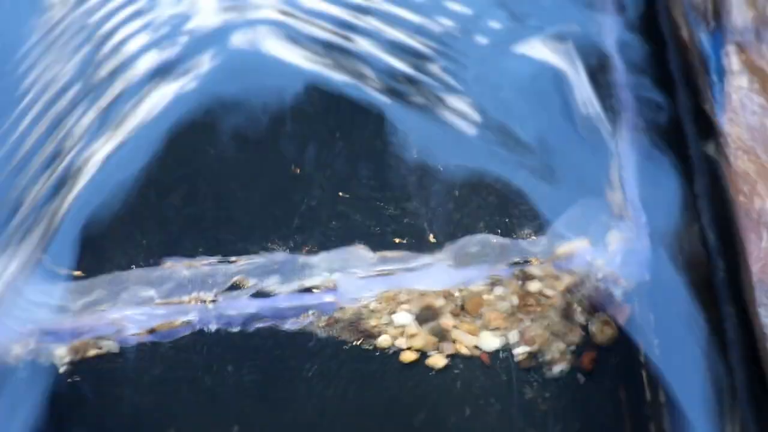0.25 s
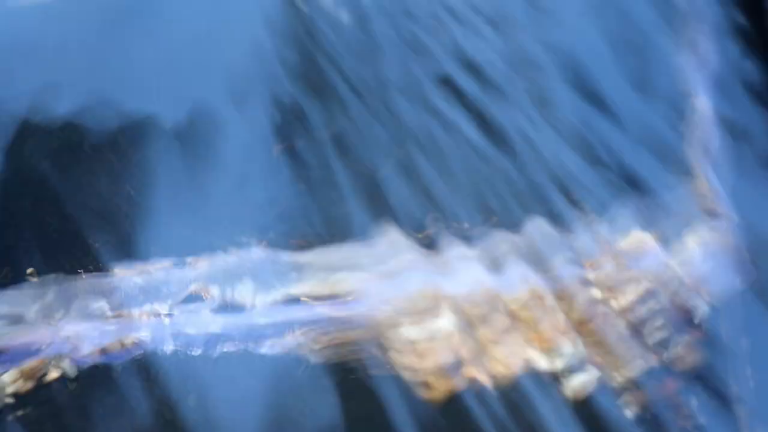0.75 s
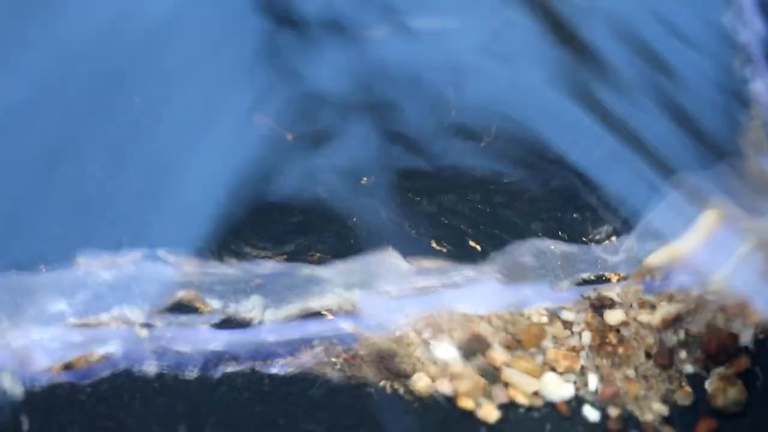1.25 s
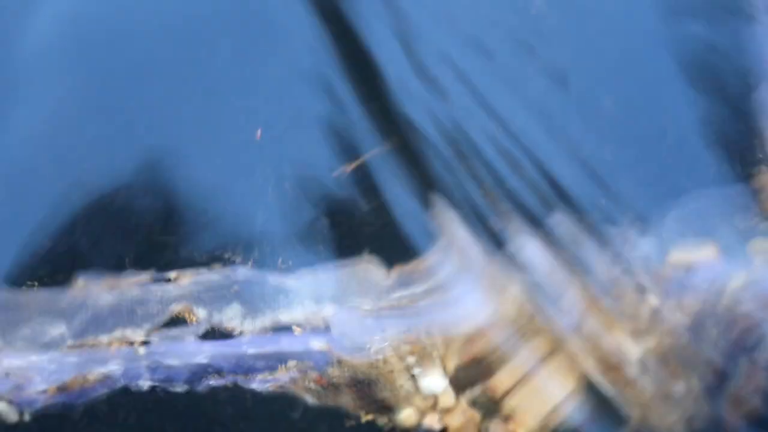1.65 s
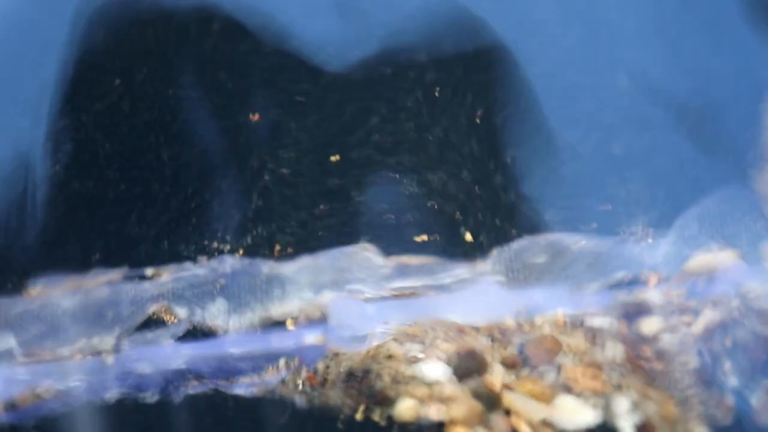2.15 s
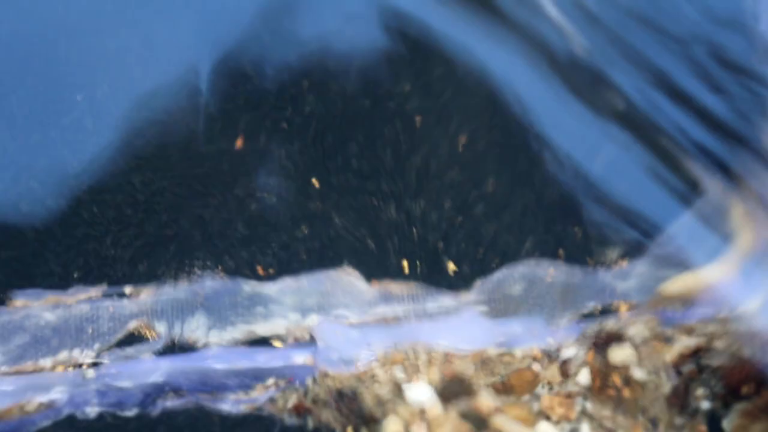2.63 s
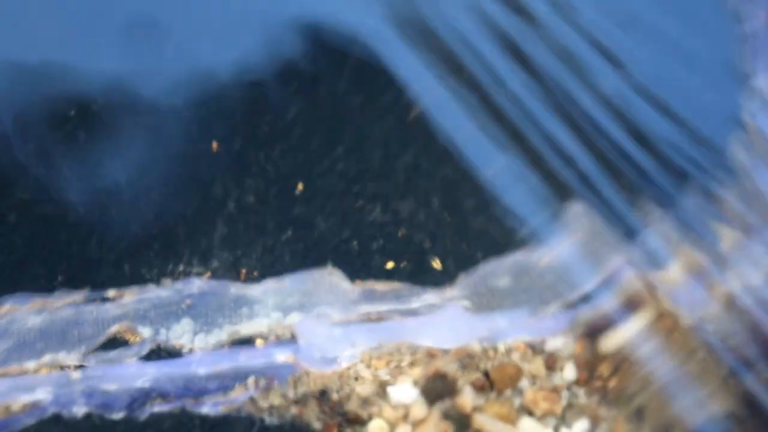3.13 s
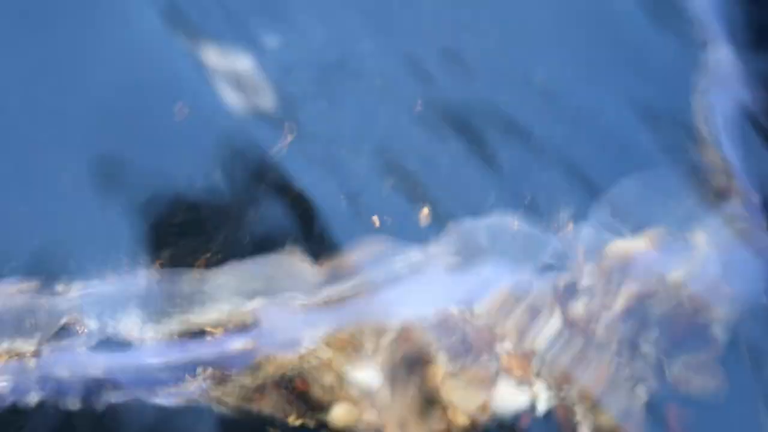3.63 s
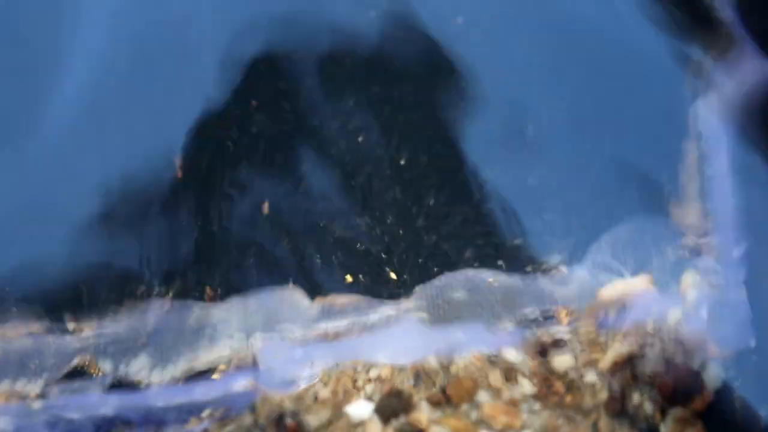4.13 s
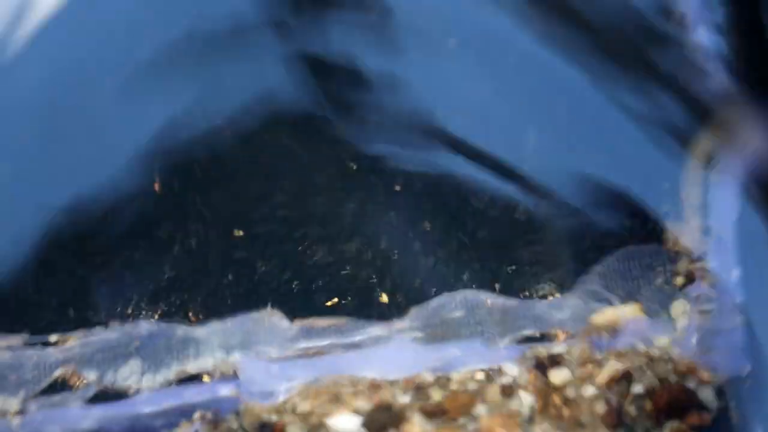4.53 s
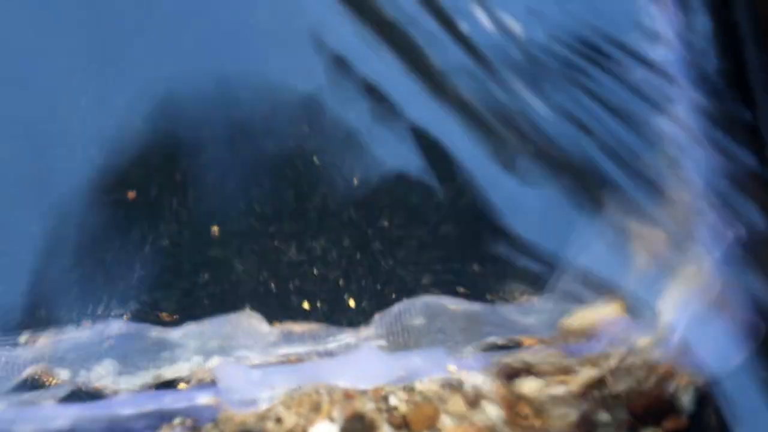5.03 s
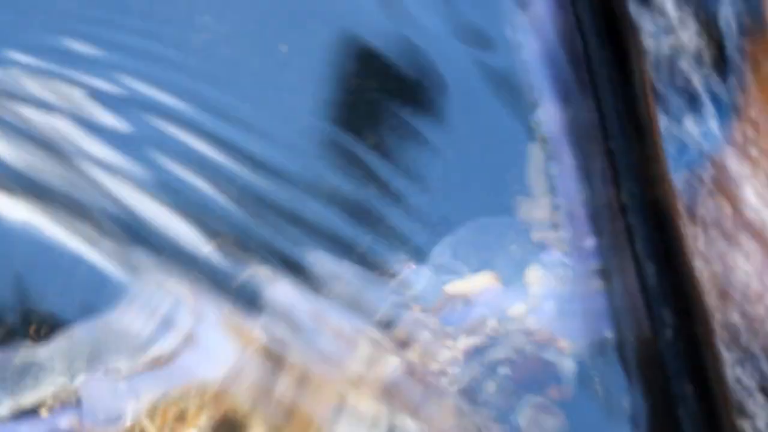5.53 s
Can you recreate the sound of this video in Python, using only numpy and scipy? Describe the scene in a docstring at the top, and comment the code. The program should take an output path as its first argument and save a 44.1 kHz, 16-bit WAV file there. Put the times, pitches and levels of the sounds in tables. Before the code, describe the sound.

Close, steady gurgling and bubbling of river water pouring over the ridges of a sluice box, with light splashes.

```python
"""A sluice box in a river, the microphone close to the running water. From the start, air pockets folded
in behind the riffles gurgle, small bubbles pinch off and plink, and spray ticks on the surface, over the
wash of farther water, a faint drone of the box and a low rumble. The sheet of water slaps down on a
riffle now and then, hardest at 0.5, 3.5 and 5.1 s. Towards the end the deep gulps and the rumble grow."""
import sys
import numpy as np
from scipy import signal
from scipy.fft import rfft, irfft, next_fast_len
from scipy.io import wavfile
from scipy.ndimage import map_coordinates

SR = 44100
rng = np.random.default_rng(int(sys.argv[2]) if len(sys.argv) > 2 else 0)


def unload_wav(signal):
    """Save mono or channel-first audio to the path in sys.argv[1] as 16-bit WAV at rate SR, clipped to [-1, 1]."""
    wavfile.write(
        sys.argv[1],
        SR,
        np.round(np.clip(np.atleast_2d(signal).T, -1, 1) * 32767).astype(np.int16),
    )


N = 254765

# the loudest air pockets, close behind the riffle:
# (time of peak [s], pitch [Hz], level [dB], glide [octaves per swell time])
LOUD_GURGLES = [(0.128, 610, -30.5, -0.11), (0.173, 680, -29, 0.078), (0.273, 840, -27, -0.097),
                (0.561, 1090, -25.5, -0.21), (0.630, 1140, -25, .15), (0.683, 870, -27, -0.16),
                (0.950, 416, -34.5, 0.0096), (0.987, 732, -24, .32), (1.090, 561, -26.5, -0.074),
                (1.192, 556, -31, 0.13), (1.249, 556, -29, 0.026), (1.549, 630, -31, 0.28),
                (1.600, 1324, -27, 0.088), (2.098, 933, -26, 0.047), (2.110, 755, -29.5, 0.23),
                (2.172, 943, -25, 0.43), (2.209, 1255, -24.5, .45), (2.323, 545, -27.5, 0.24),
                (2.351, 947, -22.5, -0.18), (2.423, 1130, -29, -0.0044), (2.438, 524, -30.5, -0.086),
                (2.526, 1200, -27.5, .05), (3.003, 1024, -31.5, -.03), (3.092, 706, -26.5, -0.14),
                (3.236, 475, -36, -0.026), (3.763, 1155, -23, -0.17), (3.897, 807, -25, .28),
                (4.232, 860, -28, .22), (4.336, 442, -32.5, 0.15), (4.420, 1076, -24.5, 0.12),
                (4.464, 1294, -27.5, 0.064), (4.651, 1350, -29.5, -0.12), (4.700, 597, -29.5, 0.27),
                (4.715, 399, -32.5, .02), (5.016, 857, -23, 0.13), (5.223, 1265, -28, 0.13),
                (5.317, 1430, -24.5, -0.084), (5.517, 1240, -26, -0.0045)]
# the loudest close bubbles, low plops to high ticks: (time [s], pitch [Hz], level [dB], ring time [ms])
LOUD_PLINKS = [(0.0437, 2900, -10, 0.63), (0.552, 9590, -18, .2), (0.5854, 1970, -21.5, 8),
               (0.6578, 2700, -12.5, 0.84), (0.7694, 3450, -20, 2.7), (1.0024, 4500, -11, 1.2),
               (1.0695, 2490, -19.5, 2.6), (1.1551, 3980, -17, 1.9), (1.2951, 3830, -16, 1),
               (1.531, 1245, -21.5, 6), (1.533, 629, -24, 13), (1.8139, 3720, -19, 1.7),
               (2.0795, 3420, -13.5, 0.68), (2.6743, 3320, -16.5, 1.3), (2.838, 700, -22, 11.5),
               (2.8825, 3500, -20.5, 1.4), (3.0262, 1780, -20, 3.8), (3.0633, 3280, -15, 1.1),
               (3.1616, 4800, -19, 1.4), (3.1833, 2150, -18, 2.9), (3.287, 905, -23.5, 7.7),
               (3.489, 2610, -20.5, 4), (3.649, 5100, -17, 1.1), (3.7072, 3340, -15, 1.2),
               (4.063, 746, -24, 8.2), (4.1563, 10900, -18.5, .2), (4.4267, 1460, -21.5, 17),
               (4.5797, 2800, -15, 3.4), (4.6177, 4600, -9, 0.37), (4.7371, 3380, -14, 1.7),
               (4.9288, 4770, -12, 0.29), (4.9946, 1980, -16.5, 1.4), (5.0941, 2580, -18, 1.6),
               (5.1654, 1680, -19, 3.3), (5.3965, 8550, -16, 0.23), (5.494, 4540, -15, .85),
               (5.6638, 3520, -17.5, 3.7)]
# the sheet of water slaps down on the riffle: (time [s], lift of the splashing [dB])
RIFFLE_SLAPS = [(0.504, 10.5), (0.71, 0), (1.185, 3.5), (2.09, 5.5), (3.506, 13.5), (4.01, 3), (4.49, 1),
                (4.585, 7), (5.108, 12), (5.39, 2.5), (5.489, 8), (5.67, -3)]

# how each layer rises and falls: (time [s], level [dB])
CHURN_LEVELS = [(0, -33), (.48, -39.5), (.65, -36), (1.2, -35), (1.42, -40.5), (1.62, -33.5), (1.9, -38),
                (2.1, -36), (2.65, -37.5), (2.9, -35), (3.6, -37), (4.2, -35.5), (4.87, -38.5),
                (5.05, -36.5), (5.78, -37)]  # water tumbling behind the riffles
SPLASH_LEVELS = [(0, -35.5), (.4, -38.5), (.9, -36.3), (1.8, -39), (2.2, -37), (2.55, -38), (2.8, -36),
                 (3.2, -38.5), (4.05, -37), (4.27, -33.5), (4.55, -38.5), (5.78, -38)]  # the sheet of water falling back on itself
GULP_LEVELS = [(0, -62), (1, -56), (1.36, -76), (1.7, -48), (2.1, -56.5), (2.6, -63), (4.1, -50),
               (5.1, -57.5), (5.44, -44), (5.78, -59)]  # the largest pockets collapsing
THROB_LEVELS = [(0, -51), (.6, -45), (1.6, -56), (2.45, -57), (2.8, -48), (3.3, -56), (3.6, -47.5),
                (4.2, -58), (5, -48), (5.78, -55)]  # the slow throb of the current

# tone of each layer at the microphone: (frequency [Hz], relative level [dB])
CHURN_SPECTRUM = [(200, -41.5), (310, -26.5), (400, -6), (560, 0), (850, 1), (1200, -1), (1700, -6),
                  (2600, -23.5), (5000, -50)]  # large air pockets
SPLASH_SPECTRUM = [(300, -56), (900, -6), (1700, -6), (2350, 2.5), (2850, -3.5), (3400, 2), (4100, -8),
                   (5000, -5.5), (6500, -18), (9000, -23.5), (15000, -58)]  # small bubbles
SPRAY_SPECTRUM = [(1500, -48), (4000, 6.5), (6500, 1), (9000, -0.5), (11000, -4.5), (13500, -4.5),
                  (15800, -10)]  # the tiniest bubbles
WASH_SPECTRUM = [(150, -13), (270, -16.5), (400, -9.5), (600, -1), (1100, 7), (1700, -2), (3400, -2),
                 (4200, -12.5), (5200, -12), (6600, -20.5), (10000, -24), (13500, -25.5), (15800, -32)]  # farther water
THROB_SPECTRUM = [(6, -27.5), (13, -7), (19, -4.5), (25, -9), (35, -21.5), (48, -32), (70, -33), (150, -59)]  # the current, at the bottom edge of hearing
RUMBLE_SPECTRUM = [(40, -8), (68, -5), (95, 4), (115, -2.5), (150, -10), (250, -8), (600, -21)]  # the bass of the flow


def gurgles():
    """Close air pockets swell and glide, a few loud among many softer; the loud ones shed fragments."""
    peak_s, hz, db, glide = np.transpose(LOUD_GURGLES)
    swell_s = 8 / hz  # eight of its own cycles, so large pockets last longer
    loud = np.column_stack([peak_s - swell_s, hz, db, 1000 * swell_s, glide])
    soft = strays(count=75, pitch_hz=1357, spread_octaves=.55, life_cycles=7.5,
                  level_db=-31.5, scatter_db=3.5, glide=.12, glide_spread=0.203)
    pockets = bubbles(np.vstack([loud, soft]), swelling, pitch_age=0.95)
    return pockets + bubbles(fragments(loud), struck, pitch_age=0.36)


def fragments(pockets, count=2, gap_s=.02, rise_octaves=0.409, loss_db=6):
    """Rows of the smaller pockets that each one breaks into, in turn later, higher and softer."""
    s, hz, db, life_ms, glide = np.transpose(pockets)[:, :, None]
    late, small = np.arange(1, count + 1) + 0.32 * rng.standard_normal((2, len(pockets), count))
    shrink = 2 ** (rise_octaves * small)
    columns = s + gap_s * late, hz * shrink, db - loss_db * small, life_ms / shrink, glide / shrink
    return np.column_stack([column.ravel() for column in columns])


def plinks(glide=-0.051):
    """Small bubbles close to the microphone pinch off with a tick and a short ring."""
    loud = np.column_stack([LOUD_PLINKS, np.full(len(LOUD_PLINKS), glide)])
    soft = strays(count=110, pitch_hz=3304, spread_octaves=0.545, life_cycles=6.65,
                  level_db=-21.5, scatter_db=3.0, glide=glide, glide_spread=0.08)
    return bubbles(np.vstack([loud, soft]), struck)


def churn():
    """Many large air pockets tumble behind the riffles; some swell slowly, others plop at once."""
    swell_rows = crowd(count=1700, low_hz=335.2, high_hz=2416, life_cycles=4.44,
                       spread_db=3.0, glide=0.14, glide_spread=0.12)
    plop_rows = crowd(count=1200, low_hz=393.4, high_hz=2072, life_cycles=6.54,
                      spread_db=1.0, glide=0.013, glide_spread=0.087)
    swells = unit(bubbles(swell_rows, swelling, pitch_age=0.96))
    plops = unit(bubbles(plop_rows, struck))
    return coloured(swells + amp(-3) * plops, CHURN_SPECTRUM)


def splash(splashes):
    """Small bubbles break off where the sheet of water falls back on itself."""
    rows = crowd(count=7500, low_hz=1070, high_hz=8140, life_cycles=6.7,
                 spread_db=1.5, glide=-0.038, glide_spread=0.078)
    return coloured(bubbles(rows, struck) * splashes, SPLASH_SPECTRUM)


def slaps(half_length_s=0.011):
    """How far the slaps on the riffle lift the splashing, in dB over time."""
    s, lift_db = np.transpose(RIFFLE_SLAPS)
    from_slap_s = np.arange(N) / SR - s[:, None]
    return lift_db @ np.exp(-(from_slap_s / half_length_s) ** 2)


def spray(splashes):
    """The tiniest bubbles fizz in clusters, each with a brief pitch of its own."""
    rows = crowd(count=7000, low_hz=4770, high_hz=15200, life_cycles=2.7,
                 spread_db=4.5, glide=0, glide_spread=0.052)
    clusters = splashes * bursts(count=1300, fade_ms=4.9, spread_db=1.0) * amp(2.7 * wobble(100))
    return coloured(bubbles(rows, struck) * clusters, SPRAY_SPECTRUM)


def gulps():
    """The largest pockets collapse with low gulps."""
    rows = crowd(count=520, low_hz=327, high_hz=436, life_cycles=3.34,
                 spread_db=3.0, glide=0.072, glide_spread=0.055)
    return unit(bubbles(rows, swelling, pitch_age=1))


def box_echoes(x, t60_s, wet_db, size=2048):
    """The close walls smear each bubble by milliseconds; the moving water keeps changing the echoes."""
    pieces = np.pad(x, (0, -N % size)).reshape(-1, size)
    t = np.arange(size) / SR
    tails = rng.standard_normal(pieces.shape) * amp(-60 * t / t60_s) * (t > .001)
    tails /= np.linalg.norm(tails, axis=1, keepdims=True)
    echoes = signal.fftconvolve(pieces, tails, axes=1)
    where = size * np.arange(len(pieces))[:, None] + np.arange(echoes.shape[1])
    return x + amp(wet_db) * np.bincount(where.ravel(), echoes.ravel())[:N]


def river(drone_hz=122, drone_width_hz=9, rumble_rise_db_per_s=1.82):
    """Farther water merges into a wash; the flow throbs, rumbles and makes the box drone faintly."""
    rumble_db = -65 + rumble_rise_db_per_s * np.arange(N) / SR
    wash = amp(-38 + 1.85 * wobble(30)) * coloured(rng.standard_normal(N), WASH_SPECTRUM)
    throb = amp(curve(THROB_LEVELS)) * coloured(rng.standard_normal(N), THROB_SPECTRUM)
    rumble = amp(rumble_db) * coloured(rng.standard_normal(N), RUMBLE_SPECTRUM)
    drone = filtered(rng.standard_normal(N),
                     lambda hz: 1 / (1 + (2 * (hz - drone_hz) / drone_width_hz) ** 2))
    return wash + throb + rumble + amp(-66) * unit(drone)


def bubbles(rows, shape, pitch_age=0):
    """A gliding sine per row: (time [s], pitch [Hz], level [dB], life [ms], glide [octaves per life])."""
    s, hz, db, life_ms, glide = np.transpose(rows)
    life_s = np.maximum(life_ms, .1) / 1000
    lengths = (7 * life_s * SR).astype(int)
    first = np.cumsum(lengths) - lengths
    owner = np.repeat(np.arange(len(s)), lengths)  # the bubble each sample belongs to
    step = np.arange(len(owner)) - first[owner]
    age = step / (SR * life_s[owner])  # in lives; the row's pitch is reached at pitch_age
    pitch = hz[owner] * 2 ** (glide[owner] * (np.minimum(age, 3) - pitch_age))
    cycles = np.cumsum(np.minimum(pitch, SR / 2)) / SR
    cycles = cycles - cycles[first][owner]
    wave = amp(db)[owner] * shape(age, cycles) * np.sin(2 * np.pi * cycles)
    start = np.abs(s * SR).astype(int)
    return np.bincount(start[owner] + step, wave, N)[:N]


def swelling(age, cycles):
    """An air pocket's note grows while it closes, peaks at age 1 and fades."""
    return (age * np.exp(1 - age)) ** 2


def struck(age, cycles):
    """A bubble that pinches off is at full size within a cycle, then dies away."""
    return np.exp(-age) * (1 - np.exp(-4 * cycles))


def strays(count, pitch_hz, spread_octaves, life_cycles, level_db, scatter_db, glide, glide_spread):
    """Rows of single close bubbles, loosely spaced in time; the longer one rings, the lower its peak."""
    slip, strength = rng.random((count, 2)).T
    height, ring, bend = np.clip(rng.standard_normal((count, 3)).T, -2, 2)
    hz = pitch_hz * 2 ** (spread_octaves * height)
    stretch = np.exp(.35 * ring)
    db = level_db + scatter_db * (2 * strength - 1) - 10 * np.log10(stretch)
    life_ms = 1000 * life_cycles * stretch / hz
    s = (np.arange(count) + 2 * slip) % count / count * N / SR
    return np.column_stack([s, hz, db, life_ms, glide + glide_spread * bend])


def crowd(count, low_hz, high_hz, life_cycles, spread_db, glide, glide_spread):
    """Rows of random bubbles: small ones are higher and shorter, and a few stand out from the rest."""
    when, height, rank = rng.random((count, 3)).T
    ring, bend = rng.standard_normal((count, 2)).T
    hz = low_hz * (high_hz / low_hz) ** height
    cycles = life_cycles * np.exp(.4 * ring)
    # equal power per Hz over the whole crowd, with an exponential spread of levels
    db = 20 * np.log10(hz / low_hz / np.sqrt(cycles)) - spread_db * np.log(rank + .02)
    life_ms = 1000 * cycles / hz
    return np.column_stack([when * N / SR, hz, db, life_ms, glide + glide_spread * bend])


def bursts(count, fade_ms, spread_db):
    """Envelope of little splashes: each starts at once and dies away."""
    when, rank = rng.random((count, 2)).T
    peaks = amp(-spread_db * np.log(rank + .03))
    power = np.bincount((when * N).astype(int), peaks ** 2, N)
    decay = np.exp(-1000 / (fade_ms * SR))
    return unit(np.sqrt(signal.lfilter([1], [1, -decay], power)))


def amp(db):
    """Decibels to gain."""
    return 10 ** (np.asarray(db) / 20)


def unit(x):
    """x at rms 1."""
    return x / np.sqrt(np.mean(x ** 2) + 1e-20)


def curve(rows):
    """A level for every sample from (time [s], level [dB]) rows."""
    s, db = np.transpose(rows)
    return np.interp(np.arange(N) / SR, s, db)


def wobble(per_s):
    """A smooth random curve with per_s knots a second."""
    return map_coordinates(rng.standard_normal(2048), [np.arange(N) * per_s / SR], mode="wrap")


def filtered(x, response):
    """x times a response of frequency."""
    size = next_fast_len(N + SR // 2)
    return irfft(rfft(x, size) * response(np.fft.rfftfreq(size, 1 / SR)), size)[:N]


def coloured(x, spectrum, size=8192):
    """x through a causal filter with the given (frequency [Hz], level [dB]) points, at rms 1."""
    hz, db = np.transpose(spectrum)
    gain = amp(np.interp(np.log(np.fft.rfftfreq(size, 1 / SR) + 1), np.log(hz), db))
    cepstrum = irfft(np.log(gain))
    cepstrum[1:size // 2] *= 2  # minimum phase: nothing rings ahead of a bubble
    cepstrum[size // 2 + 1:] = 0
    impulse = irfft(np.exp(rfft(cepstrum)))
    return unit(signal.fftconvolve(x, impulse)[:N])


def scene():
    """Close bubbles in the box, river behind; surges move churn, splash and spray, eddies the gulps."""
    slap_db = slaps()
    surge, eddy = wobble(per_s=36), wobble(per_s=9)
    splashes = bursts(count=1500, fade_ms=4.2, spread_db=-1.5)
    gulping = amp(curve(GULP_LEVELS) - 1 + 2 * eddy) * gulps()
    churning = amp(curve(CHURN_LEVELS) + 1.34 * surge) * churn()
    splashing = amp(curve(SPLASH_LEVELS) + slap_db + 0.58 * surge) * splash(splashes)
    fizz = amp(-49.5 + 0.58 * slap_db + 0.51 * surge) * spray(splashes)
    # close bubbles radiate next to nothing below the note of the largest pocket
    low_cut = signal.butter(3, 320, "highpass", fs=SR, output="sos")
    close = signal.sosfilt(low_cut, gurgles() + plinks())
    sluice = close + gulping + churning + splashing + fizz
    return box_echoes(sluice, t60_s=0.026, wet_db=-13.5) + river()


def record(dry):
    """The microphone chain keeps nothing above its band limit."""
    return filtered(dry, lambda hz: hz < 15850)


dry = scene()
out = record(dry)
unload_wav(out)
```